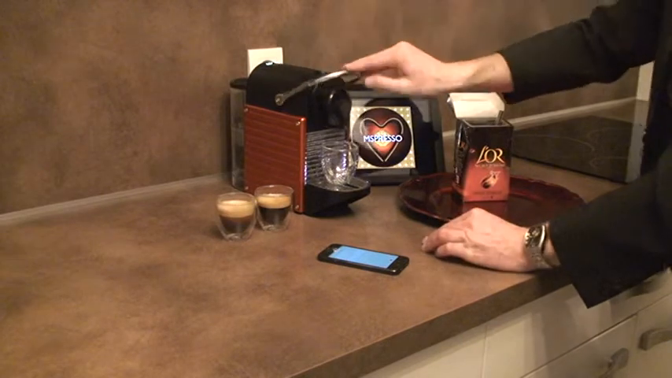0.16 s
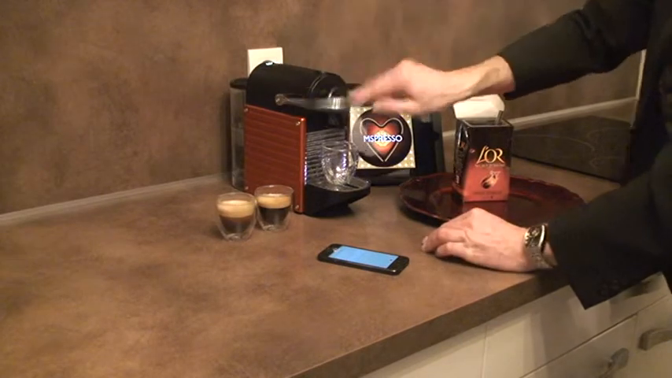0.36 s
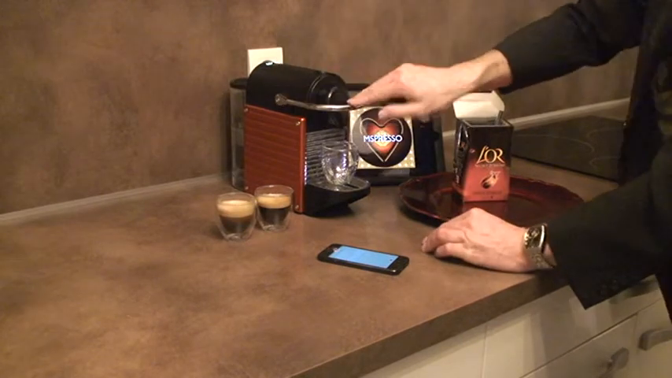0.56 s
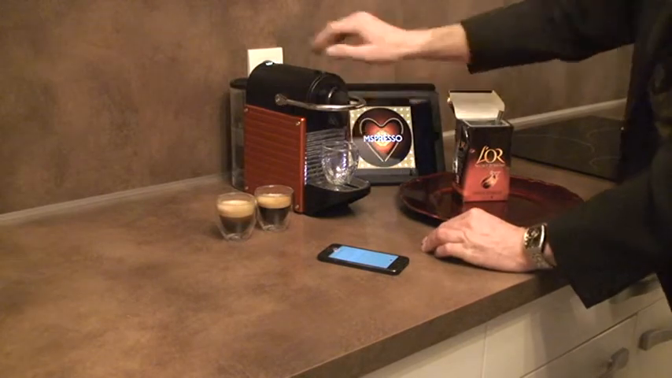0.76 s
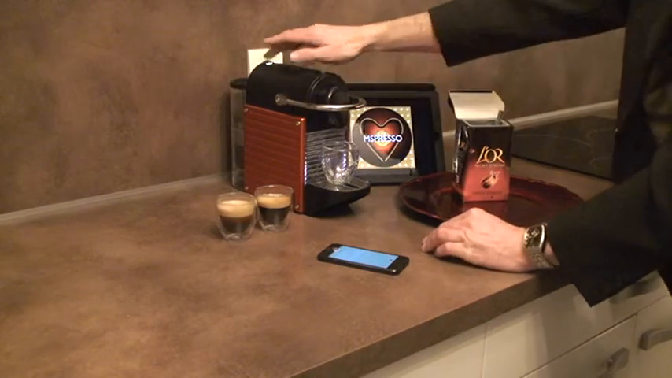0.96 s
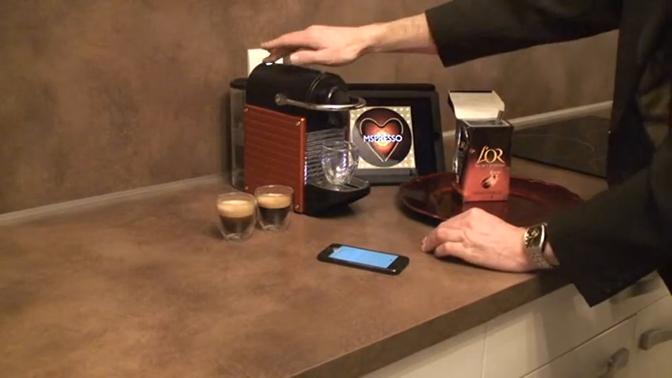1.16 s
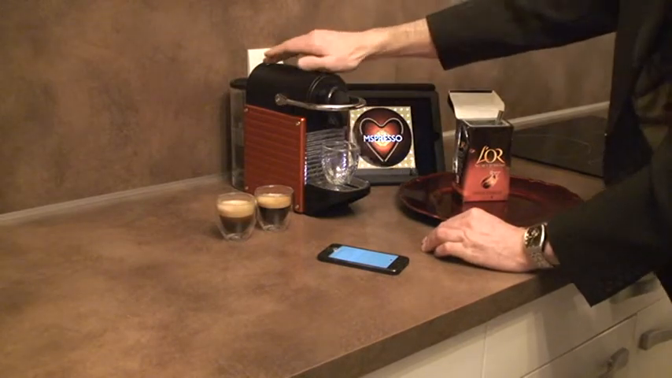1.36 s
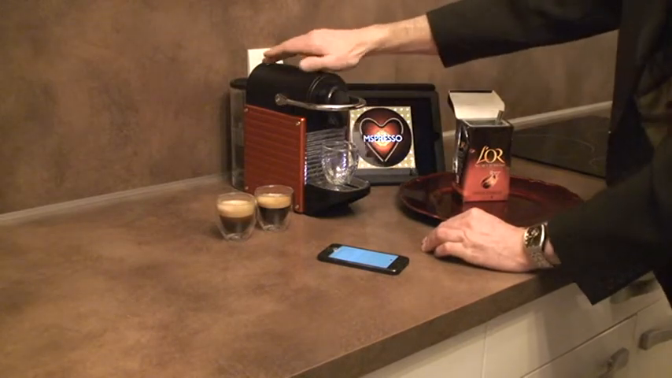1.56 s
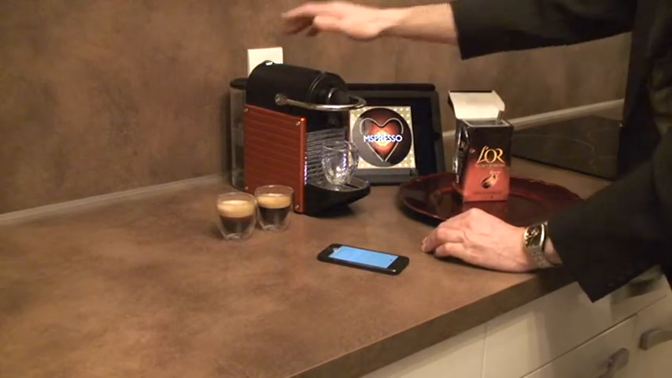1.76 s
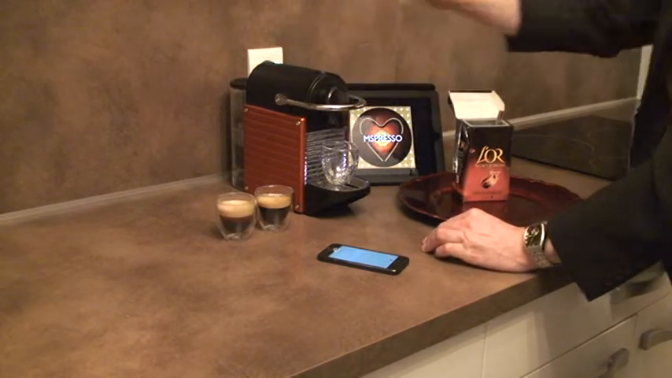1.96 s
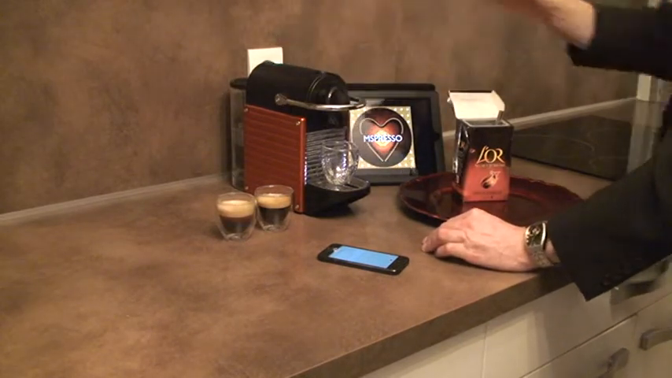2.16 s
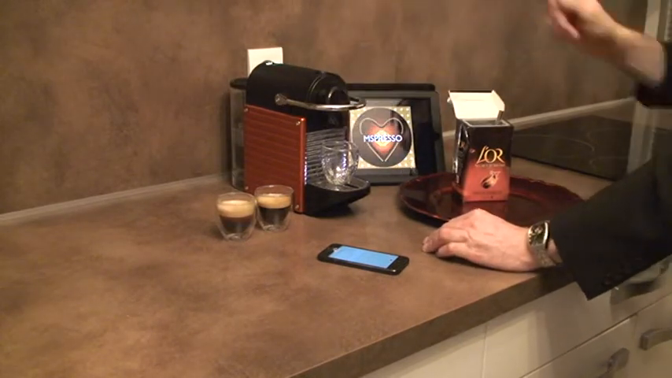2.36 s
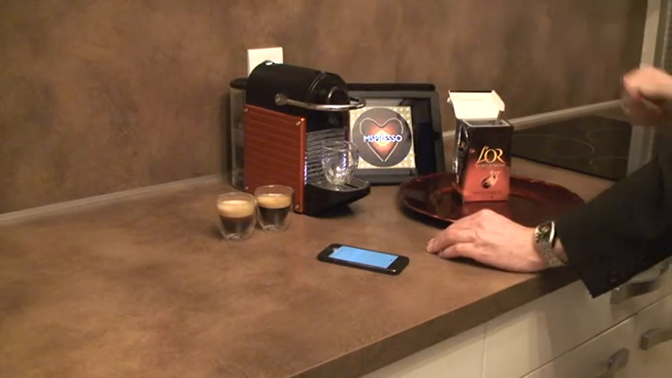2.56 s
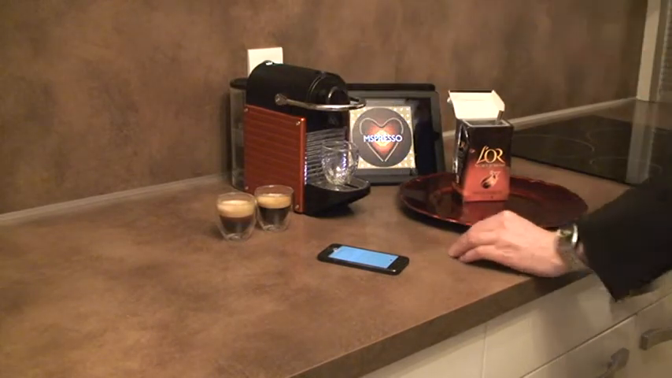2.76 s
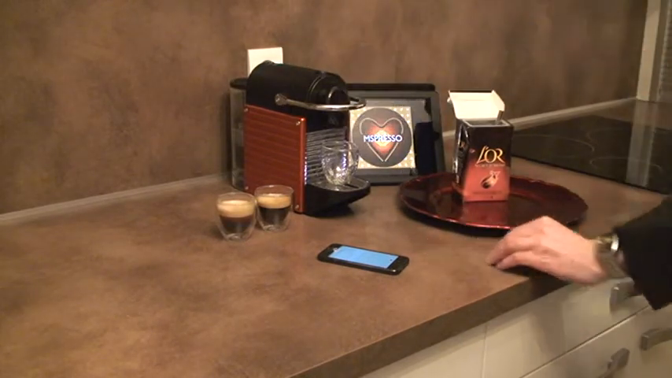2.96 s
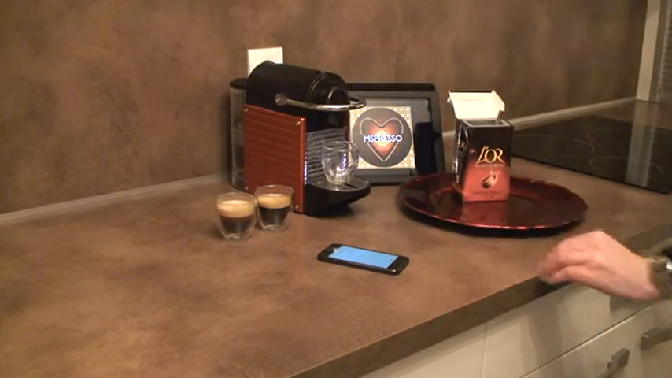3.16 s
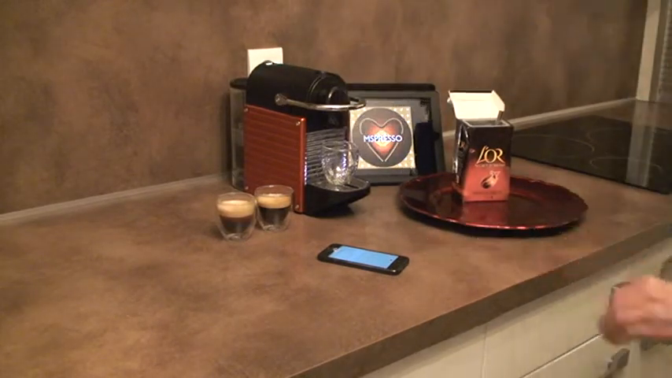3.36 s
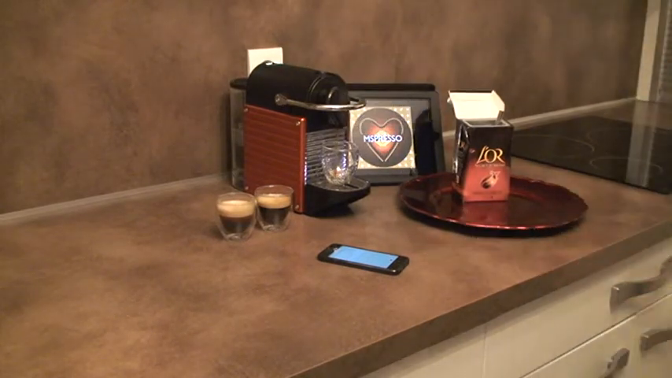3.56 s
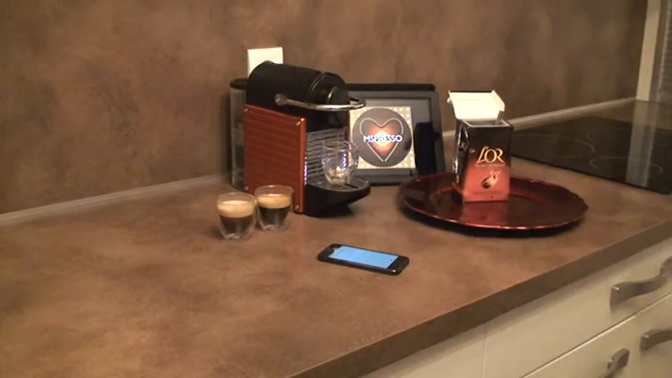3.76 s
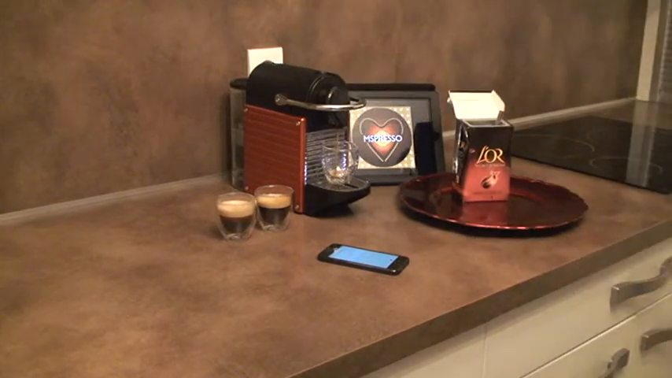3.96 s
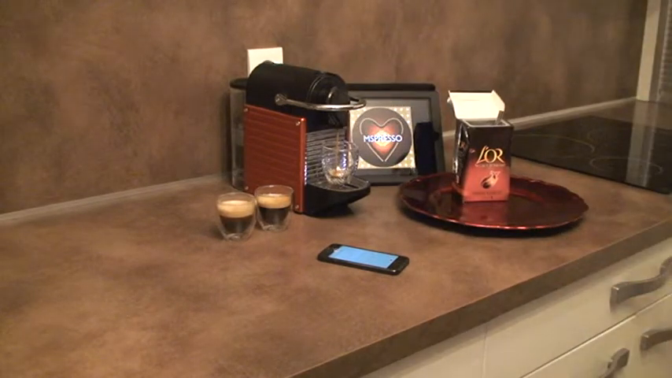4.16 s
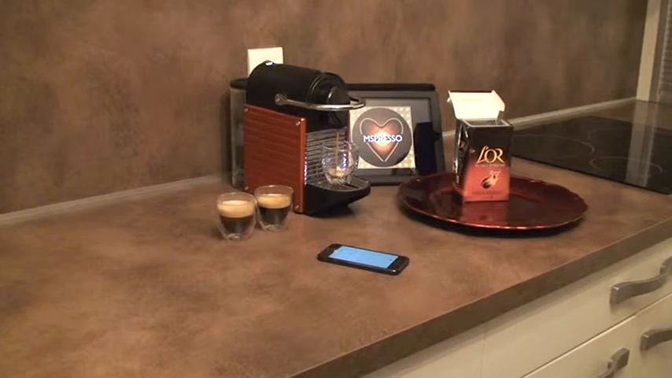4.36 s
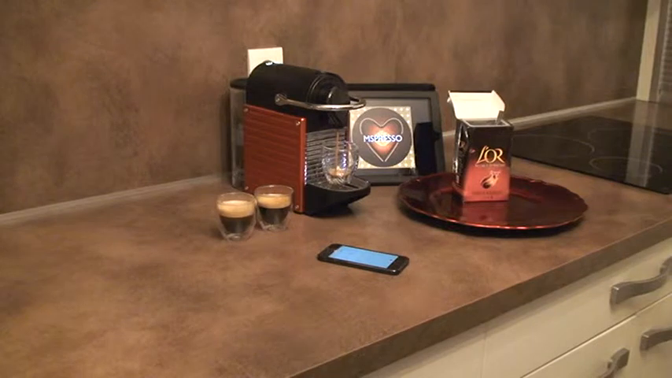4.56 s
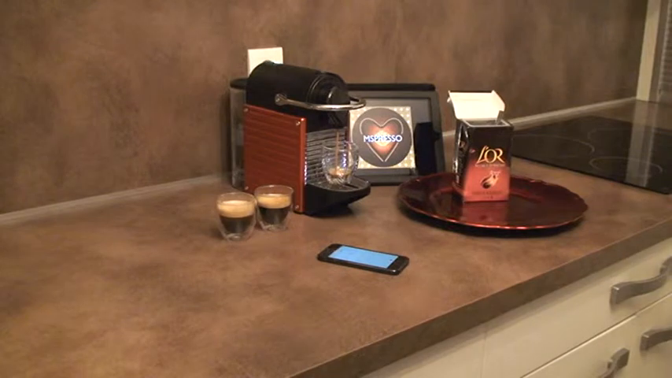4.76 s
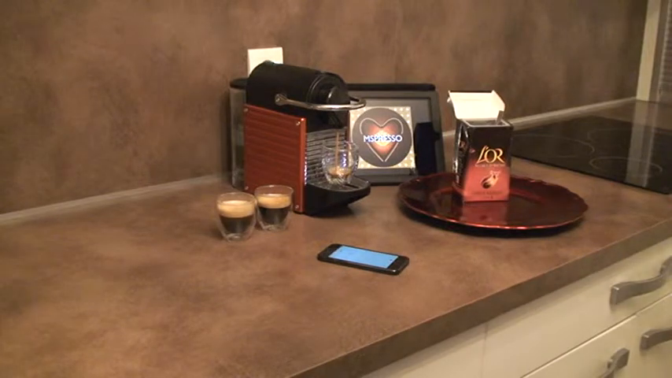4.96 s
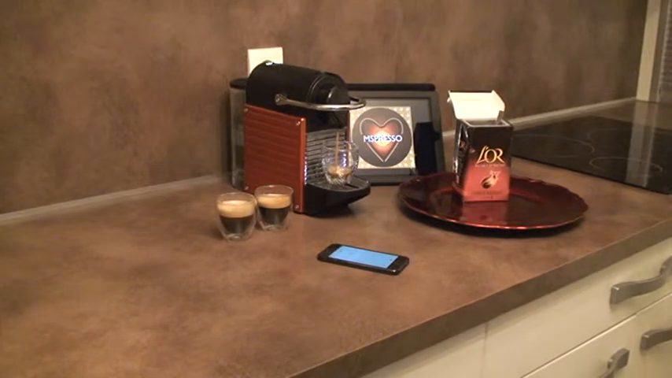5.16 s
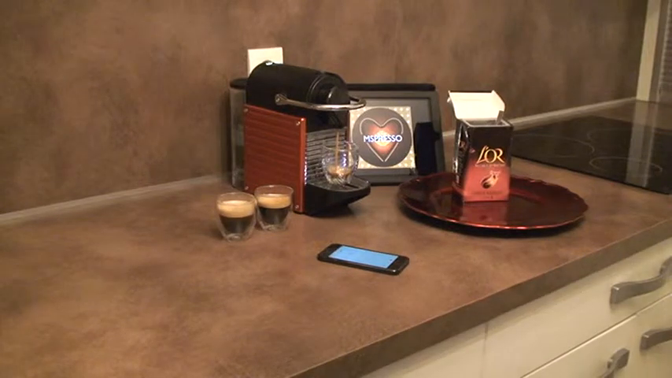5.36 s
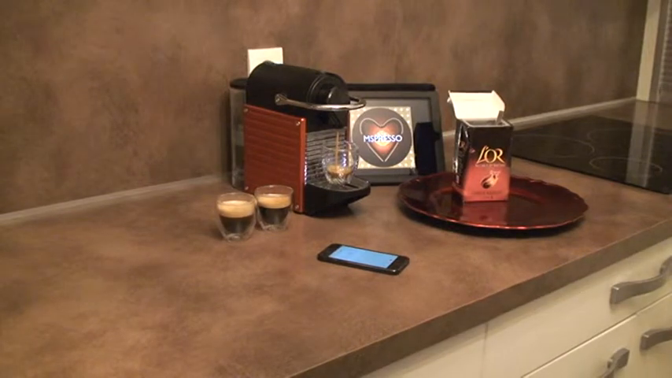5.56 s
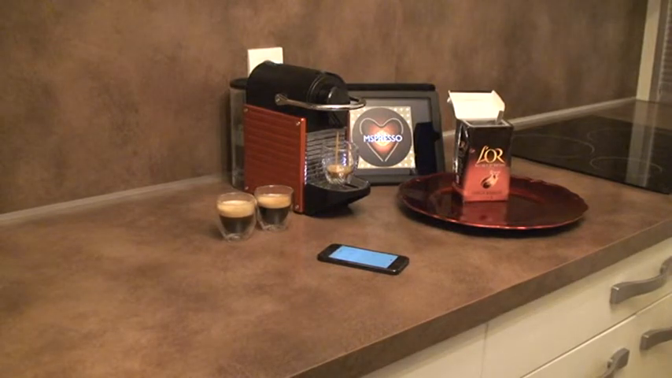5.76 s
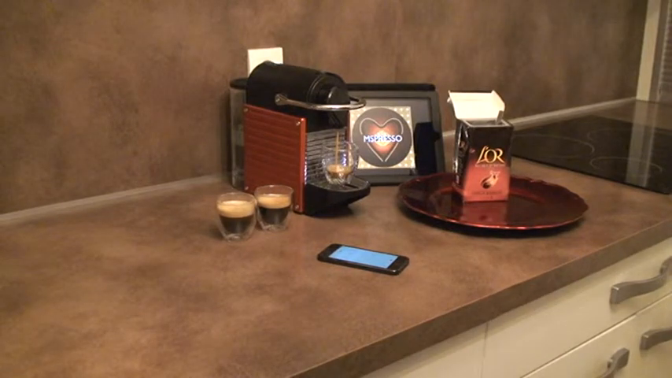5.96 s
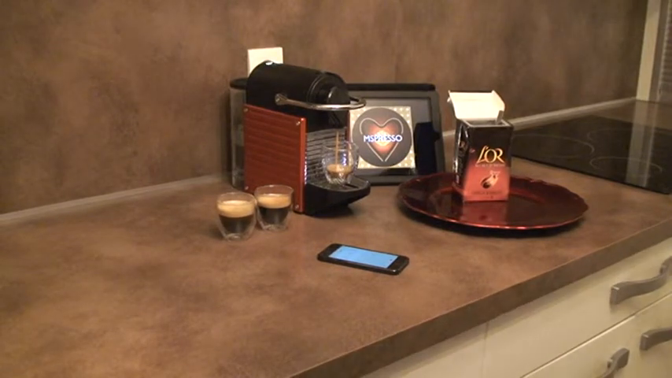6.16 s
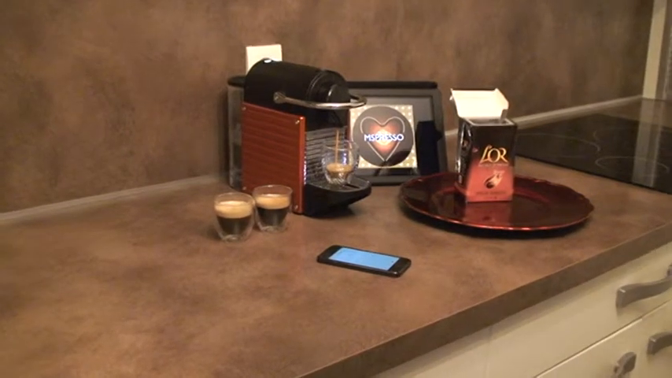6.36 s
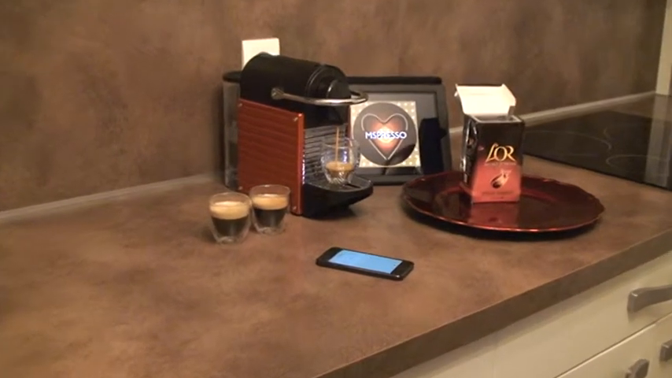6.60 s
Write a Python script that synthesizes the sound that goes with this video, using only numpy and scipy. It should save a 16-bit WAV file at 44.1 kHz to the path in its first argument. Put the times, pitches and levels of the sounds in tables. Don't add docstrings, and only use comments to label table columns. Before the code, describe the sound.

Metal lever clacks closed on a kitchen counter; after a pause, a button click starts a clattering vibration pump that softens into a steady drone.

```python
import sys
import numpy as np
from scipy import signal
from scipy.fft import rfft, irfft
from scipy.io import wavfile
from scipy.ndimage import uniform_filter1d

SR = 44100
rng = np.random.default_rng(int(sys.argv[2]) if len(sys.argv) > 2 else 0)


def pcm_store(signal):
    levels = np.round(np.clip(np.atleast_2d(signal), -1, 1) * 32767)
    wavfile.write(sys.argv[1], SR, levels.astype(np.int16).T)


def convert_level_to_amplitude(level_db):
    exponent = np.asarray(level_db, float) / 20
    return 10 ** exponent


N = 292383
TIME = np.arange(N) / SR
MAINS_HZ, PUMP_ON_S = 50, 1.35
BEAT_NULL_S = 1.9


def rms_one(x):
    return x / np.sqrt(np.mean(x ** 2) + 1e-20)


def evened(x, level_db):
    return convert_level_to_amplitude(level_db) * x / np.sqrt(uniform_filter1d(x ** 2, size=5292) + 1e-12)


def in_time(rows):
    s, *columns = np.transpose(rows)
    return [np.interp(TIME, s, c) for c in columns]


def drift(rate_hz):
    knots = rng.standard_normal(int(N / SR * 8) + 2)
    return np.interp(TIME * np.clip(rate_hz, 0, 8), np.arange(len(knots)), knots) * 1.55


def coloured(x, points):
    hz, level_db = np.transpose(points)
    log_hz = np.log(np.fft.rfftfreq(len(x), 1 / SR) + 1)
    return irfft(rfft(x) * convert_level_to_amplitude(np.interp(log_hz, np.log(hz), level_db)), len(x))


def dying_noise(t60_s, points):
    size = SR // 2
    response = coloured(rng.standard_normal(size), points) * convert_level_to_amplitude(-60 * TIME[:size] / t60_s)
    return response / np.sqrt(np.sum(response ** 2))


def resonance(hz, width_hz):
    r = np.exp(-np.pi * width_hz / SR)
    b = (1 - r * r) / 2 * np.array([1, 0, -1])
    return b, [1, -2 * r * np.cos(2 * np.pi * hz / SR), r * r]


def body(x, modes, wander_db=2.0):
    out = np.zeros(N)
    for k, (hz, width_hz, level_db, delay_ms) in enumerate(modes):
        ring = signal.lfilter(*resonance(hz, width_hz), x)
        ring = convert_level_to_amplitude(level_db) * np.roll(ring, int(delay_ms * SR / 1000))
        out += (-1) ** k * ring * convert_level_to_amplitude(wander_db * drift(1.57))
    return out


def pocket(x, bouts, width_hz):
    swell_share, block = 0.26, 128
    out = np.zeros(N)
    for start_s, length_s, from_hz, to_hz, level_db in bouts:
        state = np.zeros(2)
        for i in range(int(start_s * SR), min(int((start_s + length_s) * SR), N), block):
            done = (TIME[i:i + block] - start_s) / length_s
            b, a = resonance(from_hz + (to_hz - from_hz) * done[0], width_hz)
            ring, state = signal.lfilter(b, a, x[i:i + block], zi=state)
            swell = np.clip(np.minimum(done, 1 - done) / swell_share, 0, 1)
            out[i:i + block] += convert_level_to_amplitude(level_db) * ring * swell
    return out


def strikes(lag_ms, alternation, spread_db, jitter_ms):
    s = np.arange(PUMP_ON_S, N / SR - .008, 1 / MAINS_HZ)
    at, chance = np.round(s * SR).astype(int), rng.standard_normal((len(s), 2))
    at = at + ((lag_ms[at] + jitter_ms * chance[:, 0]) * SR / 1000).astype(int)
    blows = np.full(N, 1e-9)
    blows[at] = convert_level_to_amplitude(spread_db * chance[:, 1]) * (1 - alternation[at] * (-1) ** np.arange(len(s)))
    return blows


def chatter(blows, t60_s):
    r = convert_level_to_amplitude(-60 / (t60_s * SR))
    return rms_one(signal.lfilter([1], [1, -r], blows) * rng.standard_normal(N))


def casing_hum(lag_ms, pressure):
    # (multiple of mains, empty line [dB], pressure rising [dB], full pressure [dB])
    harmonics = [(2, -31.5, -22, -19), (3, -28, -21, -3), (4, -16, -6, -1), (5, -12.5, -4, -8),
                 (6, -50, -31.5, 7.5), (7, -14.5, -1.5, -1.5), (8, -14.5, -9.5, -25), (9, -9, -18.5, -2)]
    phase = 2 * np.pi * MAINS_HZ * (TIME - lag_ms / 1000)
    rumble_colour = [(70, -20), (110, -5), (200, 26.0), (450, 27.5), (700, -38)]
    hum = convert_level_to_amplitude(-29.5) * coloured(rng.standard_normal(N), rumble_colour)
    for k, *level_db in harmonics:
        hum += convert_level_to_amplitude(np.interp(pressure, [0, .6, 1], level_db)) * np.sin(k * phase + 0.4722 * k ** 2)
    return hum


def chamber_knock(steady, thud, flutter, loose, full):
    # (frequency [Hz], width [Hz], level [dB], delay after blow [ms])
    chamber_empty = [(498, 15, 0, 7.64), (635, 45, -1, 6.07), (700, 11.48, 0, 1.34), (801.5, 12.5, 6, 3.98),
                     (1000, 16, -3, 2.48), (1320, 85, -1, 8.5), (1510, 160, -34, 2.6)]
    chamber_full = [(520.4, 14, 0, 7.91), (603, 113, -7.5, 8.97), (658.2, 11.6, 1.2, 4.84),
                    (741, 25, -0.7, 15.09), (923, 97, -4, 6.28), (971, 30, 2.5, 4.517),
                    (1016, 22, 3, 10.601), (1160, 20, 2, 6.7), (1259, 31, 1.7, 4.37),
                    (1400.5, 19, 1.5, 4.37), (1468, 31, 0, 13.866), (1606, 10.5, -2.5, 13)]
    # (start [s], length [s], from [Hz], to [Hz], level [dB])
    tray = [
        (1.3, 0.56, 926, 870, 7),
        (1.937, 0.77, 797, 855, 7.5),
        (2.598, 0.11, 940, 980, 2),
        (2.79, 0.33, 914, 1000, 6),
        (3.1, 0.7, 956, 977, 9.5),
        (3.545, 1.4, 1000, 980, -1.5),
    ]
    big_pockets = [
        (1.7, 0.94, 430, 817, 1),
        (2.742, 0.94, 700, 700, 1.5),
    ]
    small_pockets = [(1.36, 0.21, 1190, 1125, 2), (1.4, 0.37, 1340, 1320, -1), (1.76, 0.36, 1170, 1410, 5),
                     (2.0, 0.55, 1366, 1370, -1.5), (2.75, 0.42, 1345, 1380, 1.5),
                     (2.95, .9, 1120, 1150, -2), (2.95, .7, 1280, 1500, -3), (4.2, .7, 1130, 1100, -3)]
    tank = [(1.55, 0.47, 1150, 1150, 17), (1.98, 0.58, 1150, 1150, 2), (1.9, 0.6, 850, 850, 4.5),
            (1.75, 0.35, 550, 550, 2), (1.76, 0.63, 700, 700, 1.5), (3.6, 0.75, 1000, 1000, 7),
            (3.2, 0.51, 1150, 1150, 3), (2.06, 0.51, 650, 650, 6), (2.1, 0.47, 1250, 1250, 2),
            (2.13, 0.51, 1100, 1100, 5), (1.4, .4, 1200, 1100, 10), (3.1, 0.64, 900, 900, 8.5),
            (3.0, .5, 950, 950, -2), (2.95, .3, 1400, 1400, 2), (2.2, .45, 750, 750, 3),
            (1.8, .4, 900, 900, 2), (1.8, .35, 950, 950, -2)]
    flutter_bouts = [(3.15, .6, 970, 960, -5), (4.7, 3.1, 727, 860, -9.5), (4.44, 2.7, 960, 935, -1),
                     (4.4, 3, 1212, 1270, -1.5), (5.87, 3.01, 1459.2, 1400, -1.5)]
    tick = rms_one(steady) + .55 * loose * chatter(steady, t60_s=.1)
    knock = (1 - full) * body(tick, chamber_empty) + full * body(tick, chamber_full, wander_db=1.5)
    knock += np.roll(pocket(thud, tray, width_hz=41.0), 50)
    knock += pocket(tick, big_pockets, width_hz=62.0) - pocket(tick, small_pockets, width_hz=64.96)
    knock += pocket(tick, tank, width_hz=6.0)
    knock += pocket(flutter, flutter_bouts, width_hz=45)
    return signal.sosfilt(signal.butter(3, 300, "high", fs=SR, output="sos"), knock)


def frame_ring(steady, flutter, loose, full):
    # (frequency [Hz], width [Hz], level [dB], delay after blow [ms])
    frame_empty = [(1764, 390, 6.5, 4.1), (2020, 150, 10, 6.6), (2305, 140, 6, 2.97), (2175, 85, 7, 5),
                   (2610.3, 270, -1.5, 6.9)]
    frame_full = [(1830, 13, -5.6, 16.02), (1955, 18, 1.2, 8.016), (1980, 35, -4.3, 10.011),
                  (2049, 10, 2.0, 12.573), (2088, 27, 2.0, 12.664), (2204, 32, -1.7, 12.46),
                  (2280, 46, -2.0, 13.48), (2287, 122, -10.4, 10.533), (2348, 10, 0.4, 2.165),
                  (2410, 43, -5.0, 12.437), (2505, 10, 0.9, 12.188), (2531, 200, -11.3, 2.891),
                  (2602, 59, -3, 3.344), (2670, 97, -8.8, 11.394)]
    # (start [s], length [s], from [Hz], to [Hz], level [dB])
    panel = [
        (1.46, 0.24, 2310, 2290, 13),
        (1.755, 0.16, 2350, 2330, 4),
        (2.086, 0.3, 2280, 2290, 6),
        (2.497, .4, 2320, 2320, 4),
        (3.0, 1.0, 2320, 2350, -3),
        (4.9, 2, 1930, 1940, -17),
    ]
    flutter_high = [
        (4.3, 2.6, 2080, 2163, -14),
        (5.3, 2.175, 2030, 2070, -14),
    ]
    empty = 1 - full
    tick = rms_one(steady) + (0.28 * loose + 1.27 * empty) * chatter(steady, t60_s=0.16)
    ring = empty * body(tick, frame_empty) + full * body(tick, frame_full, wander_db=0.8)
    return ring + pocket(tick, panel, width_hz=67) + pocket(flutter, flutter_high, width_hz=46)


def casing_clatter(steady, pressure, loose, full):
    # (frequency [Hz], density [dB per Hz])
    clatter_empty = [(1650, -37), (2800, -8), (3080, -9), (3190, -6.5), (4000, 1.5), (4470, -1.5),
                     (4870, -3.5), (5930, -4), (6430, -1.5), (7280, -2), (10200, -11.5), (13400, -11),
                     (16000, -17)]
    clatter_full = [(1650, -13.5), (2800, -8), (3080, -15), (3410, -11), (3800, -7), (4120, -9.5),
                    (4910, -9), (5480, -9.5), (7890, -8.5), (8930, -13.5), (12200, -17.5), (14800, -22.5),
                    (16000, -15)]
    # (frequency [Hz], width [Hz], level [dB], delay after blow [ms])
    shell_empty = [(3340, 115, 1, 2.5), (3980, 340, 1, 0), (4850, 410, 4.5, 2.5), (5400, 320, -2, 7),
                   (6640, 260, -6, 0.5), (7300, 151.1, -3, 5), (7900, 280, -1, 0)]
    shell_full = [(3153, 53, 6, 1), (3242, 40, 6.5, 10.5), (3825, 120, 3.5, 9), (4430, 110, 1.5, 9.5),
                  (4900, 240, -3, 0.6), (5605, 140, -8, 12), (5514.5, 320, -6, 15.5), (6350, 220, -7.5, 9),
                  (7190, 180, -3, 3), (7700, 440, -6, 7.2)]
    # (start [s], length [s], from [Hz], to [Hz], level [dB])
    lid_bouts = [(1.3, 1.5, 4020, 3950, 10), (1.3, 1.35, 4730, 4760, 11), (1.5, 0.5, 3280, 3300, 9),
                 (1.68, 0.36, 3400, 3650, 11), (1.75, 0.85, 5500, 5600, 9), (1.9, .5, 5072, 5100, 7),
                 (1.85, .4, 4150, 4400, 7), (2.25, .45, 3750, 3750, 7), (2.55, .28, 4700, 4250, 8)]
    clicking_parts = [(4.65, 1.3, 4790, 5000, 12), (5.9, 1.84, 5030, 5550, 12), (3.48, 1.73, 4000, 3660, 4),
                      (1.26, 0.37, 7230, 6660, 12.5), (1.28, 0.48, 6600, 6250, 10),
                      (1.76, 0.8954, 6200, 6650, 11), (1.93, 0.67, 7089, 7500, 9),
                      (2.45, 0.33, 4000, 3600, 6), (2.4, .25, 6900, 6200, 0), (1.4, 0.24, 8200, 8900, 6.5),
                      (5.8, 0.76, 4240, 4600, 2), (4.9, 0.68, 3312, 3100, 4), (5.6, 1.3, 3930, 3900, 2)]
    pipe_pockets = [
        (1.6, 0.79, 2925, 5800, 0.02),
    ]
    lid_lag_ms = 1.5
    empty = 1 - full
    tick = rms_one(steady) + (0.3 * loose + 0.6 * empty) * chatter(steady, t60_s=0.12)
    lid = np.roll(pocket(tick, lid_bouts, width_hz=106), int(lid_lag_ms * SR / 1000))
    lid += pocket(tick, clicking_parts, width_hz=240)

    def dense(t60_s, colour):
        ring = rms_one(signal.fftconvolve(steady, dying_noise(t60_s, colour))[:N])
        return coloured(ring, [(4000, 1.5), (7000, -0.5), (10000, -5.5)])

    dry_buzz = chatter(steady, t60_s=0.051)
    wet_buzz = chatter(np.roll(steady, 260), t60_s=0.14)
    dry = .8 * dense(0.15, clatter_empty) + 1.15 * rms_one(coloured(dry_buzz, clatter_empty))
    dry += 0.5 * rms_one(body(tick, shell_empty, wander_db=1.5))
    dry += pocket(dry, pipe_pockets, width_hz=650)
    wet = .55 * dense(.12, clatter_full) + .85 * pressure * rms_one(body(steady, shell_full))
    wet += 0.84 * rms_one(coloured(wet_buzz, clatter_full))
    return empty * dry + full * wet - lid


def pump():
    # (time [s], strike lag in cycle [ms], water pressure [0-1], stroke force [dB])
    plunger = [(1.351, 4.7, 0.05, -15), (1.378, 3.66, 0.14, -3), (1.498, 5.65, 0.05, -1),
               (1.62, 4.46, 0.11, 0.5), (1.799, 5.73, 0.18, 3), (1.998, 6, 0.13, 0.5),
               (2.301, 5.64, 0.17, 0), (2.602, 4.3, .18, -2), (2.72, 2.47, 0.28, 0),
               (2.852, 0.94, 0.35, -0.5), (3.051, .38, 0.44, -0.5), (3.5, 0.3, 0.64, 1),
               (4.1, 0.32, 0.71, 1.5), (4.4, 0.35, 0.8, 0.5), (6.63, 0.78, 0.87, -2)]
    # (pressure [0-1], casing hum [dB], chamber knock [dB], frame ring [dB], clatter [dB])
    part_levels = [(.1, -42, -31, -38, -31.5), (0.201, -49.5, -31, -43.5, -34),
                   (0.319, -46, -39, -40.5, -47), (.44, -41.5, -41, -39.5, -48),
                   (.66, -43, -41.5, -37.5, -45.5), (.85, -43.5, -42, -37, -43.5)]
    # (start [s], length [s], from [Hz], to [Hz], level [dB])
    gulps = [(2.59, 0.097, 870, 1050, -15), (2.8, 0.23, 850, 1020, -21), (2.82, 0.18, 600, 770, -27.5),
             (2.1, 0.4, 590, 600, -19.5), (1.67, 0.26, 1700, 1660, -26.5), (2.71, 0.195, 2930, 3000, -28.5),
             (2.64, 0.17, 4250, 3770, -29.5), (2.03, 0.56, 1650, 1580, -33)]
    hum_follows = 0.34
    limp, limp_ends_s, limp_fade_s = 0.42, 1.89, 0.11
    loose_share, seated, seated_s, seated_span_s = 0.73, 0.4075, 2.37, 0.26
    lag_ms, pressure, force_db = in_time(plunger)
    steps, *parts = np.transpose(part_levels)
    hum_db, knock_db, ring_db, clatter_db = (np.interp(pressure, steps, db) + force_db for db in parts)
    hum_db = hum_db - (1 - hum_follows) * force_db
    alternation = limp * np.clip((limp_ends_s - TIME) / limp_fade_s, 0, 1)
    loose = np.clip(loose_share - seated * np.exp(-((TIME - seated_s) / seated_span_s) ** 2), 0, 1)
    full = np.clip(pressure / 0.5, 0, 1)

    uneven = strikes(lag_ms, alternation, spread_db=.8, jitter_ms=.015)
    steady = strikes(lag_ms, 0.15 * alternation, spread_db=0.0, jitter_ms=.01)
    thud = rms_one(uneven) + .7 * loose * chatter(uneven, t60_s=.1)
    every_second = steady * (-1) ** np.cumsum(steady > 1e-6)
    flutter = rms_one(every_second) + 1.1 * chatter(steady, t60_s=0.15)

    tonal = evened(casing_hum(lag_ms, pressure), hum_db)
    tonal += evened(chamber_knock(steady, thud, flutter, loose, full), knock_db)
    tonal += evened(frame_ring(steady, flutter, loose, full), ring_db)
    tonal += pocket(thud, gulps, width_hz=99)
    coil = np.sqrt(2) * np.sin(2 * np.pi * MAINS_HZ * (TIME - BEAT_NULL_S))
    tonal += convert_level_to_amplitude(-61.0 + 7.6 * pressure) * coil
    clatter = evened(casing_clatter(steady, pressure, loose, full), clatter_db)
    first_s = PUMP_ON_S + plunger[0][1] / 1000
    running = np.clip((TIME - first_s) / 0.00035, 0, 1)
    return tonal * running, clatter * running


def lever():
    # (time [s], peak [dB], brightness [dB], thump [dB], t60 [s])
    contacts = [(.002, -38, -7, -3, 0.11), (.012, -37, -11, -14, 0.063), (.019, -30.5, -8, -14, 0.055),
                (.028, -46, -19, -14.5, 0.1), (0.084, -51, 6, -12, 0.082), (0.156, -52, -17, -18.5, 0.0472),
                (0.164, -32, 0, -8, 0.03), (0.234, -39, -8, -11, .062), (.244, -36, -10, -2, .07),
                (0.281, -43, 2, -10, 0.14), (0.366, -46, -16, -1, 0.3), (0.378, -38, -16, 1, 0.33),
                (0.392, -37, -12, -1, 0.3), (0.401, -36, -11, -1, 0.2), (0.4127, -15, 5.5, -3.5, 0.064),
                (0.4186, -15.5, -2, -7, 0.11), (.434, -17, -20, 2, 0.05), (.455, -30, -9, -7, 0.11),
                (0.5776, -29.5, -5.5, -7, 0.094), (1.2328, -34.5, 9, -12, 0.039), (1.354, -36, -2, -4, 0.1)]
    # (frequency [Hz], level [dB], t60 [s] before it is shortened to 0.29 of that)
    lever_modes = [(112, 8, 0.24), (208, -8, 0.49), (356, -1, 0.22), (430, 5.5, 0.17), (576, -6, 0.1914),
                   (717, -3, 0.23), (810, -14, 0.089), (1306, -13, 0.18), (2320, -27.5, 0.14),
                   (2900, -25, 0.3946), (4370, -5, 0.096), (5300, -6.5, 0.1167), (6040, 4, 0.0565),
                   (7300, -24.5, 0.2)]
    # (frequency [Hz], density [dB per Hz])
    crack_colour = [(35, -40), (60, -32), (103, 5), (168, -3.5), (651, -4), (946, -6), (1340, -15.5),
                    (1660, -17), (6140, -21), (16000, -44.5)]
    # (start [s], length [s], from [Hz], to [Hz], level [dB])
    squeaks = [
        (0.074, 0.0306, 5350, 5400, -50),
        (0.157, 0.041, 5300, 5240, -44),
        (0.261, 0.12, 5260, 5410, -58.5),
    ]
    cup_hz, cup_db, cup_t60_s = 2950, -47, .6
    out, clicks = np.zeros(N), np.full((len(lever_modes), SR * 2), 1e-18)
    mode_hz = np.array(lever_modes)[:, 0]
    for s, peak_db, bright_db, thump_db, t60_s in contacts:
        at = round(s * SR)
        tilt = [(150, thump_db), (400, 0), (1000, 0.0083), (1800, bright_db)]
        crack = coloured(dying_noise(t60_s, crack_colour), tilt)[:SR // 3]
        out[at:at + len(crack)] += convert_level_to_amplitude(peak_db - 1.5) * crack / np.abs(crack).max()
        tilt_db = bright_db * (mode_hz > 1200) + thump_db * (mode_hz < 300)
        button_db = -15 * (s > 1)
        clicks[:, at] = convert_level_to_amplitude(peak_db + tilt_db + button_db + 2.5 * rng.standard_normal(len(lever_modes)))
    for click, (hz, level_db, t60_s) in zip(clicks, lever_modes):
        r, w = convert_level_to_amplitude(-60 / (0.29 * t60_s * SR)), 2 * np.pi * hz / SR
        ring = signal.lfilter([0, np.sin(w)], [1, -2 * r * np.cos(w), r * r], click)
        out[:SR * 2] += convert_level_to_amplitude(level_db - 22.0) * ring
    cup_drive = clicks[9] * cup_t60_s * SR / np.log(1000)
    out[:SR * 2] += convert_level_to_amplitude(cup_db) * signal.lfilter(*resonance(cup_hz, 1.9 / cup_t60_s), cup_drive)
    return out + pocket(rng.standard_normal(N), squeaks, width_hz=250.0)


def contact_bursts():
    # (time [s], peak [dB], frequency [Hz], t60 [s])
    tick_events = [(.0125, -47, 8000, .03), (0.0207, -38.5, 11500, 0.034), (.026, -45, 6500, 0.038),
                   (.084, -50, 5600, 0.0359), (.157, -48, 6000, .02), (.2345, -45, 8500, .03),
                   (.281, -55, 5300, 0.02734), (.299, -53.5, 5400, .03), (0.165, -37, 5000, 0.068),
                   (.166, -42, 10000, .05), (.188, -41, 350, .06), (.24, -40, 420, 0.06),
                   (.242, -46, 2150, 0.076), (.394, -46, 5300, 0.03), (.428, -26, 403, 0.11),
                   (.577, -38, 2800, 0.086), (.577, -44, 5000, .04), (.59, -44, 2350, .08),
                   (.414, -22, 6300, .02), (.414, -23, 4500, 0.022), (1.233, -48, 3940, 0.042),
                   (1.233, -48, 1500, .05), (1.233, -49, 2300, .05), (.416, -33, 116, .2),
                   (.42, -34, 210, .15), (.166, -46, 230, .1), (.578, -40, 850, .1)]
    out, size = np.zeros(N), SR // 4
    for s, peak_db, hz, t60_s in tick_events:
        burst = signal.lfilter(*resonance(hz, 0.25 * hz), rng.standard_normal(size))
        burst = burst * convert_level_to_amplitude(-60 * TIME[:size] / t60_s)
        at = round(s * SR)
        out[at:at + size] += convert_level_to_amplitude(peak_db) * burst / np.abs(burst).max()
    return out


def background():
    # (time [s], time to fade 10 dB [s], level [dB])
    rubs = [
        (0.0, 0.08, -56),
        (.25, 0.06, -65),
        (.92, 0.16, -64),
    ]
    # (frequency [Hz], density [dB per Hz])
    rub_colour = [(300, -9), (1000, -2), (3000, -9.5), (5400, -5), (8000, -6), (16000, -16)]
    # (frequency [Hz], level [dB])
    hiss_colour = [(35, -20), (60, -11), (149, -4.5), (621, -13), (862, -7.5), (991, -14), (2580, -19.5),
                   (2970, -22), (11800, -39), (16000, -30)]
    hiss_db, fridge_db, beat_hz = -61, -61, .725
    whine_hz, whine_db = 1685, -71
    hiss = convert_level_to_amplitude(hiss_db) * rms_one(coloured(rng.standard_normal(N), hiss_colour))
    rub_level = sum(convert_level_to_amplitude(db - 10 * ((TIME - s) / fade_s) ** 2) for s, fade_s, db in rubs)
    rub = rub_level * rms_one(coloured(rng.standard_normal(N), rub_colour))
    fridge = -np.sqrt(2) * np.sin(2 * np.pi * (MAINS_HZ - beat_hz) * (TIME - BEAT_NULL_S))
    rumble_colour = [(70, -18), (100, 4.0), (130, -5), (170, -25)]
    rumble = convert_level_to_amplitude(-71.0) * rms_one(coloured(rng.standard_normal(N), rumble_colour))
    whine = convert_level_to_amplitude(whine_db) * np.sin(2 * np.pi * whine_hz * TIME)
    return whine + hiss + rumble + rub + convert_level_to_amplitude(fridge_db) * fridge


def scene():
    wall_ms = [1.94, 4.29, 7.1]
    # (frequency [Hz], side minus mid [dB])
    width = [(40, -21), (130, -28), (300, -10), (600, -10.5), (1400, -9), (5000, -19), (8500, -17),
             (10800, -9), (11800, -24), (16000, -26)]
    kitchen_t60_s, kitchen_db = 0.33, -3.5
    tonal, clatter = pump()
    struck = 0.71 * clatter + lever() + contact_bursts()
    walls = [(60, 1.5), (300, -2.5), (3000, -3), (12000, -5.0)]
    echo = np.pad(dying_noise(kitchen_t60_s, walls), (200, 0))
    tail = convert_level_to_amplitude(kitchen_db) * signal.fftconvolve(struck, echo)[:N]
    struck = struck + 0.32 * clatter + tail + background()
    diffuse = signal.fftconvolve(struck, dying_noise(0.22, [(60, 0), (16000, 0)]))[:N]
    bounced = sum((-1) ** k * np.roll(tonal, int(ms * SR / 1000)) for k, ms in enumerate(wall_ms))
    mid = tonal + struck
    side = coloured(0.38 * bounced + 1.32 * diffuse, width)
    side += coloured(mid, [(300, -40), (700, -23), (1500, -24), (3000, -37.0)])
    side -= coloured(struck, [(5000, -49), (8000, -23), (11000, -15.5), (12000, -49)])
    return np.array([mid + side, mid - side])


def roll_off(x):
    return signal.sosfilt(signal.butter(12, 16510, fs=SR, output="sos"), x)


def record(dry):
    dry = signal.sosfilt(signal.butter(5, 38, "high", fs=SR, output="sos"), dry)
    dry = signal.sosfilt(signal.cheby2(12, 60, 16100, fs=SR, output="sos"), dry)
    return roll_off(dry)


dry = scene()
out = record(dry)
pcm_store(out)
```